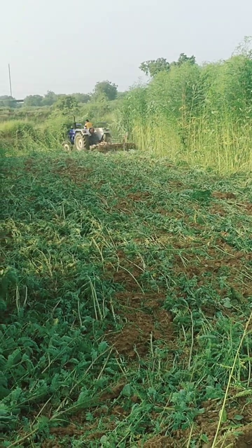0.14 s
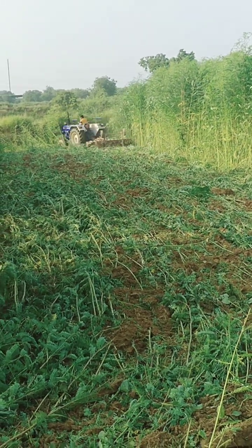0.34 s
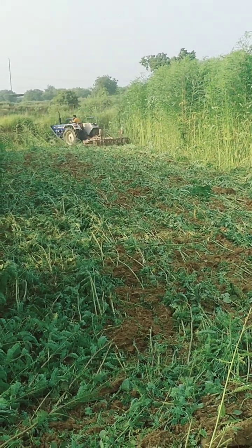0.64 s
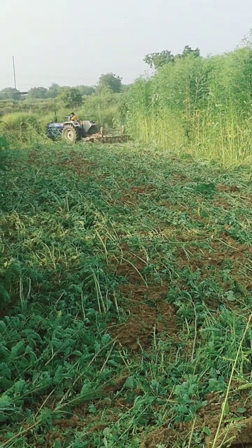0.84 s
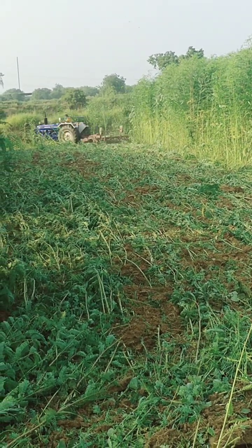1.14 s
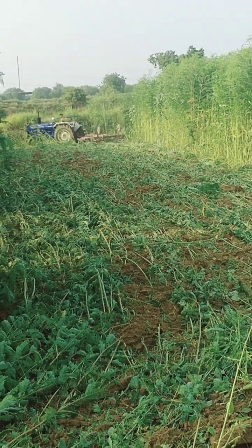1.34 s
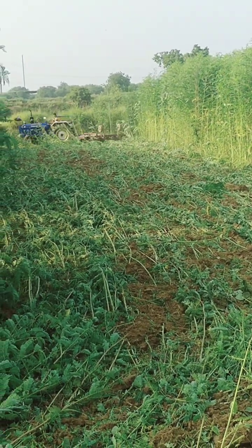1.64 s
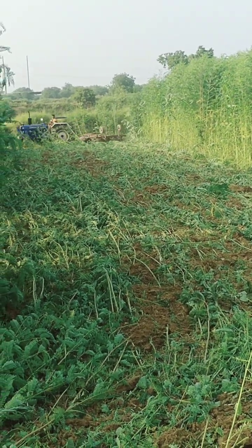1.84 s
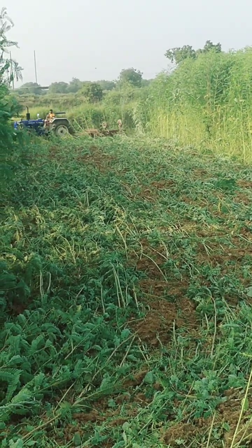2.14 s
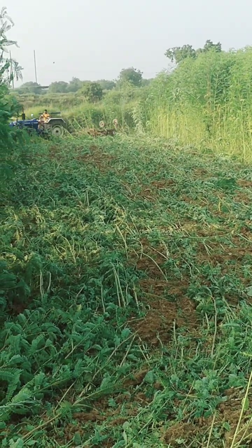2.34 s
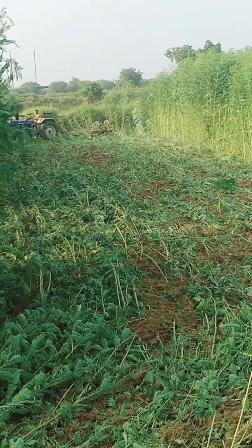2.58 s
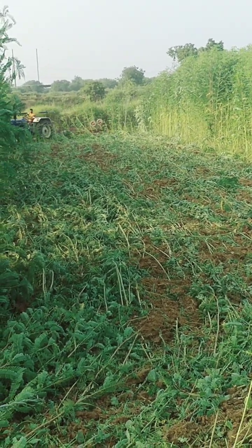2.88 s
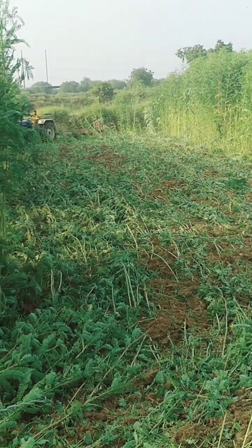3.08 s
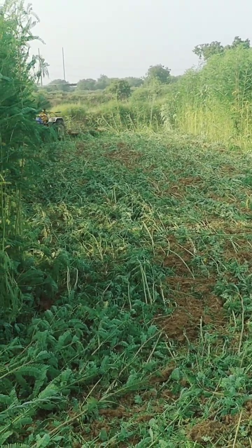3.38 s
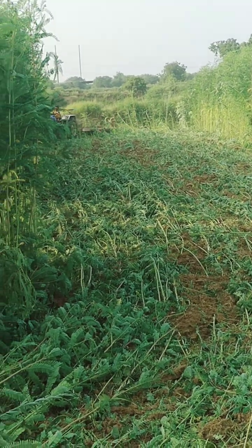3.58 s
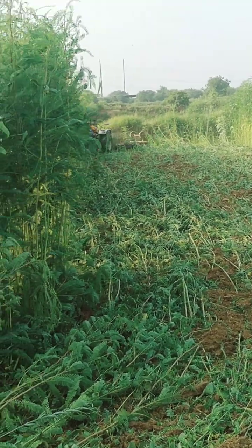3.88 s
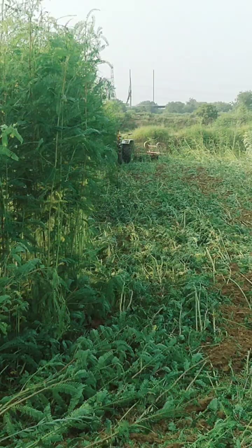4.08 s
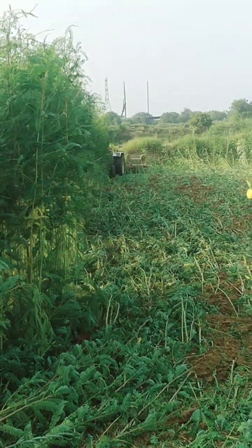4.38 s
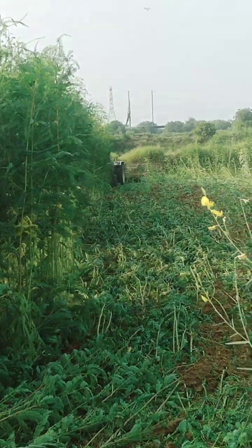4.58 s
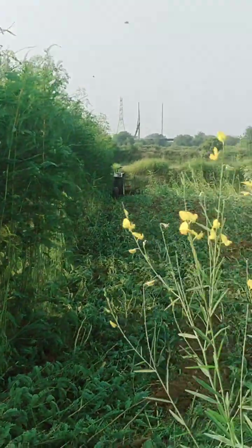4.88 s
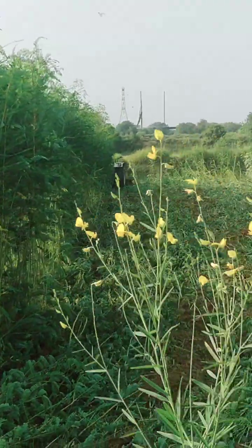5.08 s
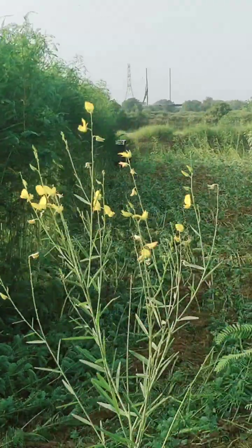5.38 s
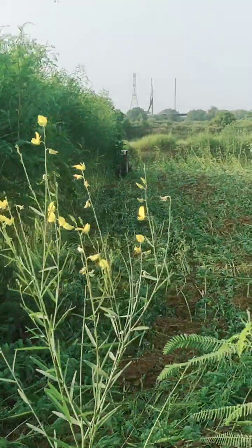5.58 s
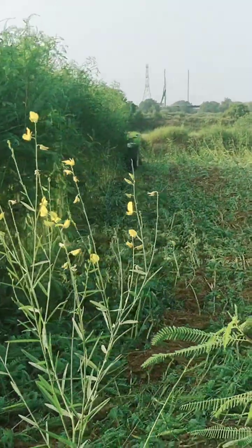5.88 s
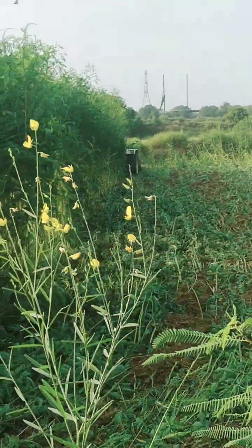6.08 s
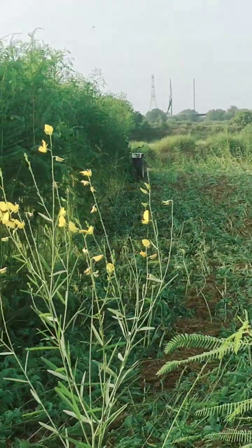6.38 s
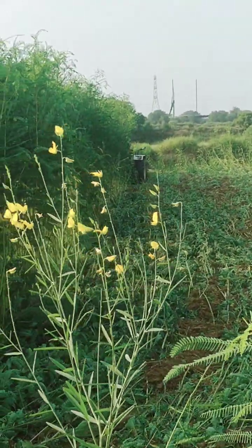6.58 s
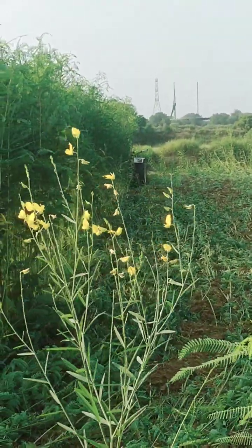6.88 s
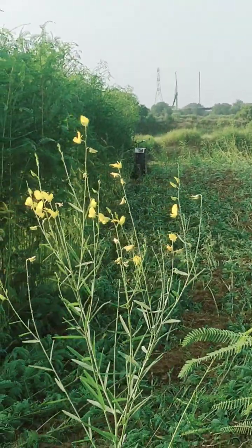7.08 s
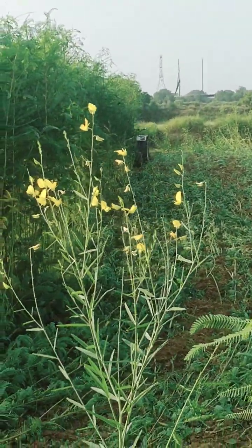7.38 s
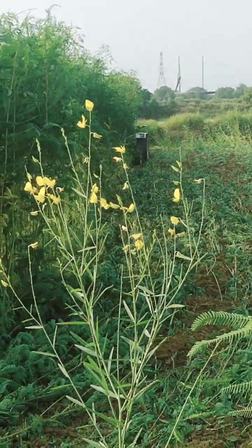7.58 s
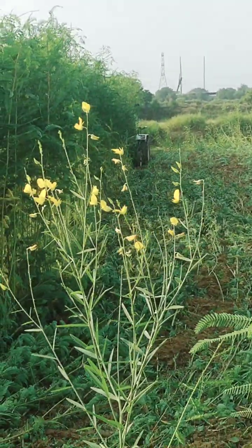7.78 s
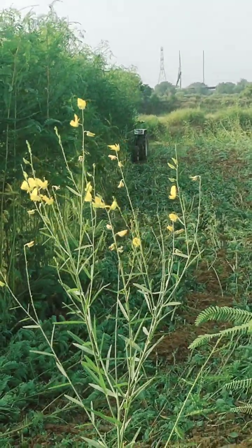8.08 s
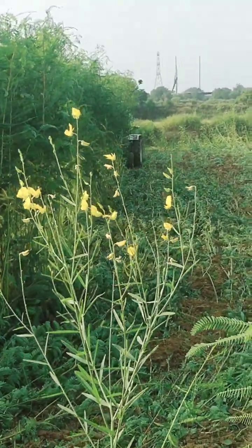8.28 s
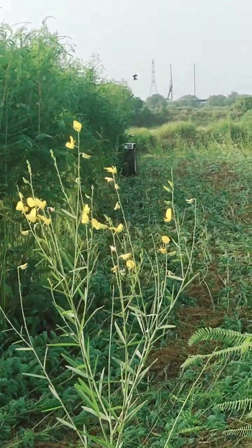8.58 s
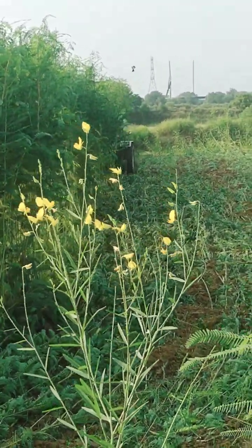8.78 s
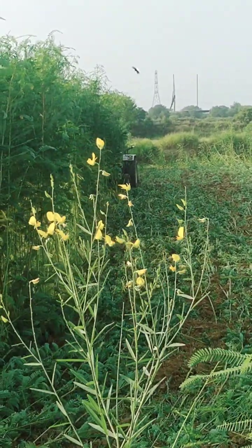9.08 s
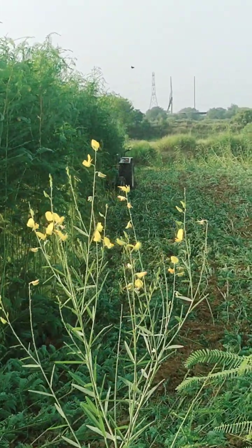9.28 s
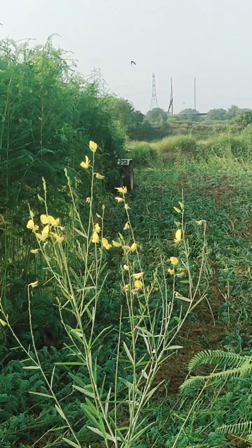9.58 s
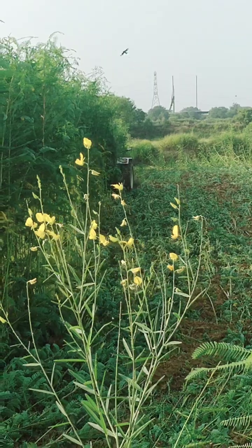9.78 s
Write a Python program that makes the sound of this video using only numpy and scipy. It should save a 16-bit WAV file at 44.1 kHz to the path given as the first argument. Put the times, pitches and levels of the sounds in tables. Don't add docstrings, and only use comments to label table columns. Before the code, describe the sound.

Open crop field, heard through one small, band-limited microphone among the stalks. From 0 s a fairly distant three-cylinder diesel tractor runs side-on behind the crop: fast low thumps, a rough puff at each firing, hissing exhaust and thin gear whine. A stem squeaks faintly at 0.2 s and snaps dully at 0.6 s; two tiny bird chips come at 1.15 and 1.3 s. The engine sags in the turn from 1 to 2.5 s, then picks up by 4 s, facing the microphone. Leaves rustle near 3.8 s; ticks lead to a loud close snap and squeak at 4.3 s, with more rustling after. A short nasal bird call sounds at 5.2 s, a brighter one at 6.7 s. At 6.1 s the engine clears, valves clattering around 6.5 s, firing unevenly and getting steadily louder to the end at 9.9 s. At 9 s the harrow gives two quick steel clanks on stones.

```python
import sys
import numpy as np
from scipy import signal
from scipy.fft import rfft, irfft, next_fast_len
from scipy.io import wavfile
from scipy.ndimage import uniform_filter1d

SR = 44100
rng = np.random.default_rng(int(sys.argv[2]) if len(sys.argv) > 2 else 0)


def undo_db(level):
    steps = np.asarray(level, float) / 20
    return 10 ** steps


def dump(signal):
    limited = np.clip(np.atleast_2d(signal).T, -1, 1)
    pcm = np.round(limited * 32767).astype(np.int16)
    wavfile.write(sys.argv[1], SR, pcm)


N = 438354
T = np.arange(N) / SR


def evened(x):
    return x / np.sqrt(np.mean(x ** 2) + 1e-20)


def noise():
    return rng.standard_normal(N)


def curves(rows, t):
    s, *columns = np.transpose(rows)
    return [np.interp(t, s, column) for column in columns]


def coloured(x, points):
    size = next_fast_len(len(x))
    point_hz, point_db = np.transpose(points)
    hz = np.fft.rfftfreq(size, 1 / SR)
    gain = undo_db(np.interp(np.log(hz + 1), np.log(point_hz), point_db))
    return evened(irfft(rfft(x, size) * gain, size)[:len(x)])


def resonate(x, hz, width_hz):
    turn = np.exp(2j * np.pi * np.cumsum(hz * np.ones(len(x))) / SR)
    r = np.exp(-np.pi * width_hz / SR)
    smoothed = signal.lfilter([1], np.convolve([1, -r], [1, -r]), x * turn.conj())
    return evened((turn * smoothed).real)


def drift(seconds):
    step = max(round(seconds * SR), 2)
    knots = np.arange(0, N + step, step)
    return evened(np.interp(np.arange(N), knots, rng.standard_normal(len(knots))))


def swell(s, rise_s, fall_s):
    t = T[::64]
    return np.interp(T, t, np.exp(-np.abs((t - s) / np.where(t < s, rise_s, fall_s)) ** 1.5))


def add(mix, s, sound):
    part = mix[round(s * SR):][:len(sound)]
    part += sound[:len(part)]


# time_s, firing_rate_hz
ENGINE_SPEED = [(0.0, 41.538), (0.75, 41.797), (1.0, 41.037), (1.5, 38.708), (1.75, 38.169), (2.25, 36.128),
                (2.5, 36.172), (4.0, 44.23), (4.25, 44.918), (5.0, 45.001), (5.75, 44.723), (6.5, 43.722),
                (6.75, 43.165), (7.25, 42.828), (8.0, 41.652), (8.5, 41.98), (9.25, 41.061), (9.94, 41.577)]
RATE = curves(ENGINE_SPEED, T)[0]
TURNS = 0.62 + np.cumsum(RATE) / SR

# time_s, nearness_db, outlet_clear_of_crop_db, engine_effort_db
PASS = [(0, -54.5, 5, -4), (.3, -53, 5.5, 0.5), (.9, -55.5, 5.5, -1), (1.4, -54, 3.5, -1.5),
        (1.8, -51, 2.5, 0.5), (2.3, -50, 3, 0), (2.65, -44.5, 3, -1), (3.3, -44.5, 5.5, -7),
        (3.8, -43.5, 2, -3), (4.25, -45, -1.5, -4), (5, -48.5, 2, -2.5), (5.25, -46.5, 2, -2.5),
        (5.6, -47, 2, -1), (5.98, -45.5, 0, -4.5), (6.12, -39.5, 4, -4), (7, -41, 4.5, -4.5),
        (8.5, -38, 2.5, -8.5), (9.94, -34, 1.5, -10.5)]
NEAR_DB, CLEAR_DB, EFFORT_DB = curves(PASS, T)

# time_s, facing_microphone_0_to_1, crop_scatter_db
HEADING = [
    (0, 0.15, 5),
    (1, 0.04, 8.5),
    (1.8, 0.05, 0.5),
    (2.6, 0.01, -2),
    (3.5, 0.06, -1.5),
    (4, 0.7, 1.5),
    (5.9, 0.54, 3),
    (6.1, 0.8, -1.5),
    (9.94, 0.85, -1),
]
FACING, SCATTER_DB = curves(HEADING, T)
FACING = np.clip(FACING, 0, 1)


# peak_s, level_db, length_s
RUSTLES = [(0.303, -64, .15), (1.5, -76, 0.33), (2.406, -81, 0.19), (3.787, -53, 0.096), (4.146, -66, .08),
           (4.37, -63, .07), (4.602, -53.5, 0.16), (4.938, -61, 0.095), (5.253, -55, 0.11),
           (5.845, -59, 0.17), (6.2, -66, 0.099), (7.39, -64, 0.76), (8.494, -77, 0.25), (8.83, -61, 0.17),
           (9.155, -65, .2), (9.55, -66, 0.14), (9.855, -61, 0.16)]
# pitch_hz, level_db_per_hz
LEAF_COLOUR = [(2000, -30), (4000, -7), (7500, -4), (11500, -12), (12800, -10), (15000, -1), (16000, 0)]


def leaves():
    grains = undo_db(4.1 * np.minimum(rng.exponential(1, N), 5)) * noise()
    brush = sum(undo_db(db) * swell(s, length, 0.6 * length) for s, db, length in RUSTLES)
    breeze = undo_db(NEAR_DB - 32)
    return undo_db(4.5) * (brush + breeze) * coloured(grains, LEAF_COLOUR)


# start_s, level_db, low_edge_hz, high_edge_hz, length_s
SNAPS = [
    (0.582, -50.5, 2800, 7000, 0.0037),
    (4.013, -53, 12000, 16000, 0.0018),
    (4.14, -59, 9100, 16000, .002),
    (4.2, -60, 11000, 15900, .002),
    (4.338, -41.5, 4400, 9000, 0.0043),
]


def snaps():
    out, t = np.zeros(N), np.arange(1000) / SR
    for s, db, low_hz, high_hz, length in SNAPS:
        colour = [(.6 * low_hz, -30), (low_hz, 0), (high_hz, -2), (1.5 * high_hz, -12), (30000, -14)]
        crack = coloured(rng.standard_normal(len(t)), colour)
        add(out, s, undo_db(db) * crack * (np.exp(-(t / length) ** 4) + 0.57 * np.exp(-t / 0.015)))
    return out


# time_s, pitch_hz, level_db
SQUEAKS = [
    [(.22, 13700, -80), (.26, 14100, -70), (.45, 13800, -75), (.52, 13500, -82)],
    [(4.35, 12400, -77), (4.4, 13200, -76), (4.44, 13200, -76), (4.47, 12300, -76), (4.51, 12900, -76),
     (4.54, 12300, -79)],
]


def squeaks():
    out = np.zeros(N)
    for rows in SQUEAKS:
        t = np.arange(rows[0][0], rows[-1][0], 1 / SR)
        hz, db = curves(rows, t)
        add(out, t[0], undo_db(db) * resonate(rng.standard_normal(len(t)), hz, 120))
    return out


# time_s, pitch_hz, level_db, upper_harmonic_loss_db
BIRD_CALLS = [
    [(5.222, 1420, -58, 14), (5.24, 1465, -47, 14), (5.26, 1475, -45, 14), (5.275, 1420, -44, 14),
     (5.297, 1280, -45, 14)],
    [(6.65, 1430, -52, 0), (6.69, 1455, -52, -4), (6.71, 1470, -40, 7), (6.75, 1470, -39, 7),
     (6.77, 1380, -51, 0)],
]
# start_s, level_db
BIRD_CHIPS = [
    (1.15, -63),
    (1.3, -62),
]
SYRINX_DB = [-16, 0, -11, -12, -9]


def bird():
    out = np.zeros(N)
    for rows in BIRD_CALLS:
        t = np.arange(rows[0][0], rows[-1][0], 1 / SR)
        hz, db, dull_db = curves(rows, t)
        cycles = np.cumsum(hz) / SR
        note = sum(undo_db(harmonic_db - dull_db * (k > 2)) * np.sin(2 * np.pi * k * cycles)
                   for k, harmonic_db in enumerate(SYRINX_DB, 1))
        level = undo_db(db + 2 + drift(0.0059)[:len(t)])
        add(out, t[0], level * note * signal.windows.tukey(len(t), .3))
    for s, db in BIRD_CHIPS:
        hz = np.geomspace(6250, 5750, num=1300)
        add(out, s, undo_db(db) * np.sin(2 * np.pi * np.cumsum(hz) / SR) * np.hanning(len(hz)))
    return out


# start_s, level_db, pitch_hz, t60_s
CLANKS = [
    (9.011, -24.5, 2710, 0.04),
    (9.01, -32, 3500, 0.058),
    (9.011, -25.5, 4320, 0.015),
    (9.077, -17, 2780, 0.015),
]


def harrow():
    out, t = np.zeros(N), np.arange(3000) / SR
    for s, db, hz, t60 in CLANKS:
        onset = 1 - np.exp(-t / 0.00031)
        add(out, s, undo_db(db - 60 * t / t60) * np.sin(2 * np.pi * hz * t) * onset)
    return out


def wavering_tone(s, cycles, db, length_s):
    level = undo_db(db + 6 + 2.5 * drift(.07)) * swell(s, length_s, length_s)
    return level * np.sqrt(2) * np.cos(2 * np.pi * (cycles + .1 * drift(.05)))


# middle_s, pitch_over_firing_rate, level_db, length_s
WHINES = [
    (.25, 20.7, -58, .2),
    (1.06, 20.6, -52, .17),
    (1.55, 20.6, -61, .13),
    (2.13, 20.8, -59, .15),
    (2.6, 20.8, -58, .2),
    (.2, 31, -61, .35),
    (.62, 31.2, -63, .15),
    (.88, 31.4, -55, .09),
    (6.15, 31.3, -56, .4),
    (8.8, 31.3, -54, 1.2),
]
# middle_s, pitch_hz, level_db, length_s
PUMP = (2.2, 1200, -68, 1.1)


def gears():
    s, hz, db, length = PUMP
    pump = wavering_tone(s, hz * T, db, length)
    return pump + sum(wavering_tone(s, teeth * TURNS, db, length) for s, teeth, db, length in WHINES)


def firing(force_db, lag, rise_s, fall_s):
    turns = np.maximum(TURNS - lag, 0)
    index, since = turns.astype(int), turns % 1 / RATE
    shape = (1 - np.exp(-(since / rise_s) ** 2)) * np.exp(-since / fall_s)
    return index, since, undo_db(force_db)[index] * shape / shape.max()


def echo(force_db, lag, db):
    return undo_db(db + SCATTER_DB) * (firing(.5 * force_db, lag, 0.0026, 0.026)[2] + 0.41)


def ring(hz, width_hz, force_db, lag, fall_s, own_db, slip, scatter):
    own, detune, phase = rng.standard_normal((len(force_db), 3)).T
    index, since, burst = firing(force_db + own_db * own, lag, 0.00086, fall_s)
    struck_hz = hz + 0.28 * width_hz * detune[index]
    strike = burst * np.sin(2 * np.pi * (struck_hz * since + slip * phase[index]))
    return resonate(strike + np.sqrt(SR / width_hz / 4) * scatter * noise(), hz, width_hz)


def ring_all(modes, waver_db, *strike):
    total = 0
    for hz, width_hz, side_db, front_db in modes:
        level = undo_db(side_db + (front_db - side_db) * FACING + waver_db * drift(.3))
        total = total + level * ring(hz * (1 + .004 * drift(.4)), width_hz, *strike)
    return evened(total)


# pitch_hz, width_hz, side_db, front_db
PIPE_MODES = [(746, 250, -0.5, 2.5), (881.6, 206, -1, -3), (1030, 235, -4, -54)]


def pipe(force_db):
    lag = -.05
    rung = ring_all(PIPE_MODES, .8, force_db, lag, 0.0019, 1.24, .16, echo(force_db, lag, -18.5))
    hum = resonate(echo(force_db, lag, 0) * noise(), 352, 152)
    return rung + undo_db(-14 + 8 * FACING) * hum


def stack(force_db):
    hz = 1520 - 150 * np.minimum(2.4 * FACING, 1)
    force_db, lag = 0.26 * force_db, -.05
    return ring(hz, 382, force_db, lag, 0.0049, 3.7, 1, echo(force_db, lag, -5.5))


# pitch_hz, width_hz, side_db, front_db
BLOCK_MODES = [(2679, 386, 2, 0.5), (2427, 370, 0.5, -5), (3024, 995, -2, -3.5), (1907, 510, -14.5, -5)]


def block(force_db):
    lag = -.13
    sink = 1 - .021 * FACING * np.maximum(SCATTER_DB, 0)
    modes = [(hz * sink, *rest) for hz, *rest in BLOCK_MODES]
    return ring_all(modes, .8, 0.22 * force_db, lag, 0.0051, 3.55, 0.97, echo(0.59 * force_db, lag, -6.5))


# peak_s, pitch_hz, level_over_block_db, rise_s, fall_s
CLATTER = (6.5, 3798, -5, 0.38, 1.44)


def clatter(force_db):
    s, hz, db, rise_s, fall_s = CLATTER
    force_db, lag = .3 * force_db, -.1
    ticks = ring(hz, 620, force_db, lag, .003, 3, 1, echo(force_db, lag, -18))
    return undo_db(db) * swell(s, rise_s, fall_s) * ticks


# pitch_hz, width_hz, side_db, front_db
HISS_MODES = [(3800, 330, -4, -3), (4300, 300, -11, 0), (4950, 380, -10, -2), (5900, 450, -9, -6),
              (7400, 600, -6, -12), (8070, 500, -9, -14), (8620, 600, -8, -14), (10100, 900, -13, -13)]
# pitch_hz, level_db_per_hz
SPRAY_COLOUR = [(2500, -37), (3300, -2), (4600, 1.5), (6600, 3), (9300, -1), (11500, -8.5), (14000, -6),
                (15800, -16)]


def hiss(force_db):
    lag, count = -.1, len(force_db)
    soft_db = .3 * force_db
    hissing = ring_all(HISS_MODES, 2.2, soft_db, lag, .003, 3.5, 1, echo(soft_db, lag, -12))
    wander_db = 2 * drift(.12)[::N // count][:count]
    spit_db = 0.18 * force_db + wander_db + 4 * rng.standard_normal(count)
    spit = firing(spit_db, lag, 0.00053, 0.0071)[2] * undo_db(-4.5 * FACING - .5 * SCATTER_DB)
    spray = coloured((spit + echo(soft_db, lag, -11)) * noise(), SPRAY_COLOUR)
    return evened(hissing + undo_db(-2.5) * spray)


# time_s, force_db
HARD_FIRINGS = [(3.077, 7), (3.133, -6), (4.586, -7), (5.191, 9), (5.613, 4), (6.63, -6), (6.655, 7.5),
                (6.679, 7.5), (6.827, -9), (6.888, -8), (6.914, -9), (7.023, -11), (7.169, -16), (7.353, 4),
                (7.85, 9.5), (8.113, -9), (8.211, -8), (8.568, -15), (8.591, 5.5), (8.66, -7), (8.88, 8),
                (8.974, -4), (9.121, 5), (9.34, 5.5), (9.413, 3), (9.436, -22), (9.461, 6), (9.534, 4),
                (9.679, 8.5), (9.8, -0.5)]


def bark():
    force_db = 1.4 * rng.standard_normal(int(TURNS[-1]) + 2)
    s, hard_db = np.transpose(HARD_FIRINGS)
    force_db[np.interp(s, T, TURNS + .05).astype(int)] = .85 * hard_db
    body = undo_db(CLEAR_DB) * pipe(force_db) + undo_db(0.5 - 4 * FACING) * stack(force_db)
    body += block(force_db) + clatter(force_db)
    body = signal.lfilter(*signal.iirnotch(490, 3.5, SR), body)
    return undo_db(NEAR_DB) * (body + undo_db(-13 + 0.65 * CLEAR_DB) * hiss(force_db))


# pitch_hz, level_db
SILENCER = [(72, -39.5), (80, -18), (90, -17.5), (108, -29), (121, -11.5), (150, -24), (203, -26.5),
            (226, -46.5)]
# time_s, lag_firings, twist_cycles
THUMP_PATH = [
    (0, .26, .95),
    (1.5, .33, 1.02),
    (2.8, .41, 1.05),
    (4, .33, .67),
    (9.94, .33, .68),
]
# time_s, multiple, change_db, length_s
FADES = [
    (0.52, 2, -12.5, 0.17),
    (0.47, 3, -15.5, 0.12),
    (1.18, 3, -19, 0.12),
    (1.35, 4, -5.5, .4),
    (0.44, 5, 1, 0.34),
    (3.8, 4, -23, 0.12),
    (7.3, 4, -13, .06),
    (3.4, 2, -1.5, 0.32),
    (8.7, 2, -6, 0.11),
    (4.75, 3, -4, 0.1),
]
# multiple_of_firing_rate, level_under_thump_db
UNEVEN = [(5 / 2, -29.5), (8 / 3, -39), (10 / 3, -21), (11 / 3, -33), (13 / 3, -29.5), (14 / 3, -23)]
# pitch_hz, level_db_per_hz
RUMBLE_COLOUR = [(18, -57), (30, -27), (51, -32.5), (121, -8), (171, -10), (210, -5.5), (262, -19.5),
                 (343, -20), (489, -27), (560, -21), (730, -41), (1230, -120)]


def thump():
    pass_hz, pass_db = np.transpose(SILENCER)
    lag, twist = curves(THUMP_PATH, T)
    lagged = TURNS - lag + 0.002 * drift(0.068)
    whole, power = np.zeros(N), np.zeros(N)
    for k in range(2, 6):
        tilt_db = 0.23 * (k - 3.5) * (NEAR_DB + 44)
        silencer_db = np.interp(np.log(k * RATE), np.log(pass_hz), pass_db)
        fade_db = sum(db * swell(s, length, length) for s, m, db, length in FADES if round(m) == k)
        level = undo_db(31 + NEAR_DB + EFFORT_DB + tilt_db + silencer_db + fade_db)
        waver = undo_db(drift(.04) + 0.5 * (k - 1) / 2 * drift(.12))
        whole += level * np.cos(2 * np.pi * (k * lagged + twist)) * waver
        power += level ** 2
    loud = np.sqrt(uniform_filter1d(power, size=SR // 2))
    uneven = sum(undo_db(db + 1.7 * drift(0.21)) * np.cos(2 * np.pi * (k * lagged + rng.random()))
                 for k, db in UNEVEN)
    rumble = undo_db(-12.5) * coloured(noise(), RUMBLE_COLOUR)
    rumble += undo_db(-16) * resonate(noise(), 198, 4)
    return np.sqrt(2) * (whole + loud * uneven) + loud * rumble


def scene():
    close_by = leaves() + snaps() + squeaks() + bird()
    tractor = harrow() + gears() + bark() + thump()
    return (close_by + tractor)[None]


def low_pass(x):
    return signal.sosfilt(signal.butter(12, 16800, fs=SR, output="sos"), x)


def record(dry):
    band_limit = signal.firwin(767, 15820, window=("kaiser", 9), fs=SR)
    limited = signal.oaconvolve(dry, band_limit[None], "same")
    return low_pass(limited)


dry = scene()
out = record(dry)
dump(out)
```